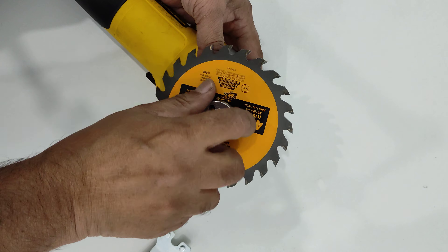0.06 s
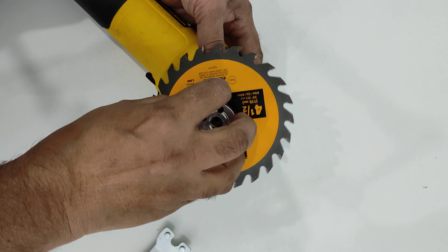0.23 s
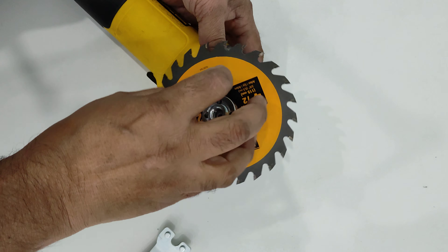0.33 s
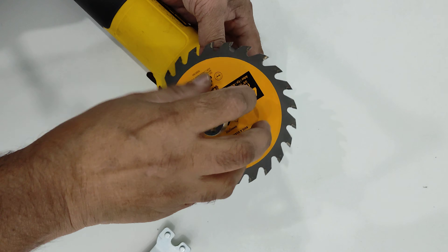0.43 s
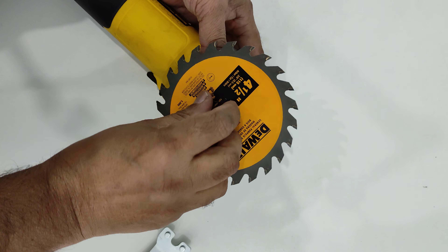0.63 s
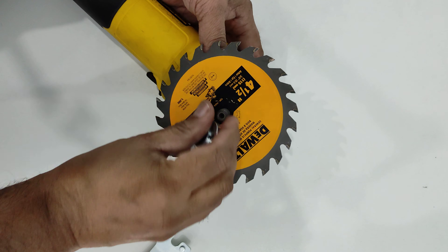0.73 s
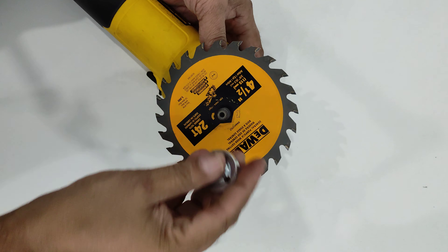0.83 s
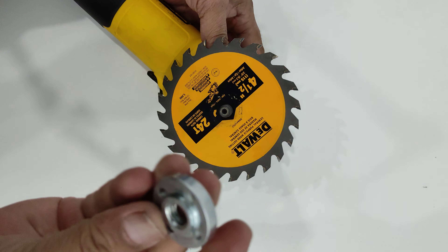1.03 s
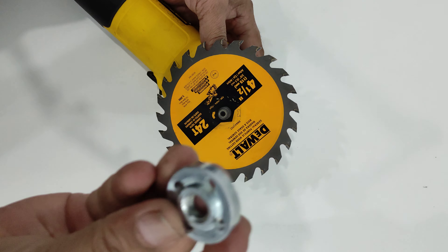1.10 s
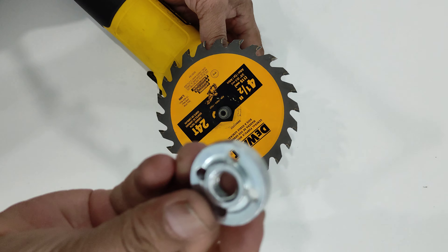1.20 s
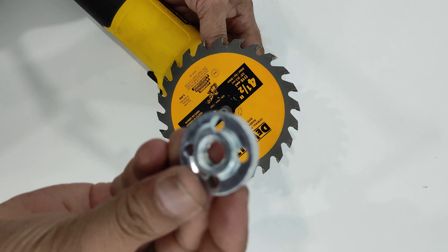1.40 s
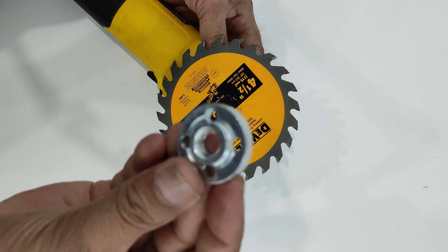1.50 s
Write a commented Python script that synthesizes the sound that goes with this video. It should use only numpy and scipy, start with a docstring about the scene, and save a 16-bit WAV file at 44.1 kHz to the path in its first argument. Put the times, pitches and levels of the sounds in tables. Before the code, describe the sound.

A steel nut clinks on an angle grinder's saw blade as it is unscrewed by hand. Light ticks come in the first 0.4 seconds, then one bright, ringing clink just before 0.5. A grainy thread rasp follows until about 0.7. Smaller clicks, blade knocks and soft, low handling bumps continue to around 1 second. The ringing then fades by 1.5, leaving the small room's faint rumble.

```python
"""Ticks, scrapes and one bright clink: a steel flange nut is spun off an angle grinder by hand.
The nut rasps on the spindle's thread, pings its tip, drops onto the saw blade and is lifted away.
Each steel contact sets nut and blade ringing; the loose blade knocks on its seat.
The hand bumps the grinder's body. The small room echoes the blows and rumbles faintly."""
import sys
import numpy as np
from scipy import signal
from scipy.fft import rfft, irfft, next_fast_len
from scipy.io import wavfile
from scipy.ndimage import map_coordinates

SR = 44100
rng = np.random.default_rng(int(sys.argv[2]) if len(sys.argv) > 2 else 0)


def wav_record(signal):
    """Record a signal, one row per channel, as 16-bit PCM in the file named by sys.argv[1]."""
    frames = np.transpose(np.atleast_2d(signal))
    bounded = np.clip(frames, -1, 1)
    # unit amplitude maps onto the largest positive 16-bit level
    quanta = np.round(bounded * 32767).astype(np.int16)
    wavfile.write(sys.argv[1], SR, quanta)


N = 68355

# Steel on steel. Each row: start in seconds, clack, tick and ring gains in dB, contact length in seconds.
CONTACTS = [(0.001, -64, -65, -53, 0.021), (0.027, -44.5, -72.5, -64, 0.0077),
            (0.167, -52.5, -43.5, -33.5, 0.035), (0.2401, -40, -29.5, -41, 0.037),
            (0.26, -50, -54, -46, 0.018), (0.3147, -41.5, -64, -54, 0.015), (0.316, -32, -42, -45, .012),
            (0.353, -38.5, -89.5, -65, 0.019), (0.4487, -24.5, -21, -9.5, 0.035),
            (0.468, -33.5, -25.5, -23.5, 0.023), (0.4721, -19, -15, 3.5, 0.04),
            (0.477, -31.5, -23.5, -23.5, 0.065), (0.5018, -26.5, -32, -15, 0.024),
            (0.607, -30.5, -37, -29, 0.025), (0.614, -36.5, -40, -31, 0.026),
            (0.717, -36.5, -33.5, -27.5, 0.032), (0.781, -50, -53, -35, .02),
            (0.829, -41.5, -77.5, -49, 0.026), (0.873, -34.5, -41, -29.5, 0.044),
            (0.938, -37.5, -69, -44.5, 0.013), (0.945, -39.5, -52, -35.5, 0.033),
            (0.99, -47, -68, -62, 0.039), (1.027, -39, -70, -71, 0.004), (1.142, -73.5, -67.5, -53, .1)]


def amp(db):
    """Decibels to gain."""
    return 10 ** (np.asarray(db) / 20)


def unit(x):
    """Scale to rms 1."""
    return x / np.sqrt(np.mean(x ** 2) + 1e-20)


def along(points, hz):
    """Interpolate (Hz, value) points on a log frequency axis."""
    points_hz, values = np.transpose(points)
    return np.interp(np.log(hz + 1), np.log(points_hz + 1), values)


def level(points):
    """Gain per sample from (seconds, dB) points."""
    return amp(np.interp(np.arange(N) / SR, *np.transpose(points)))


def wobble(rate_hz):
    """Smooth random curve, rate_hz knots a second."""
    return map_coordinates(rng.standard_normal(N // 8), [np.arange(N) * rate_hz / SR], mode='wrap')


def filtered(x, response):
    """Apply the gain response(hz) to x."""
    size = next_fast_len(N + SR // 2)
    return irfft(rfft(x, size) * response(np.fft.rfftfreq(size, 1 / SR)), size)[:N]


def noise(spectrum):
    """Noise of rms 1, coloured by (Hz, dB) points."""
    return unit(filtered(rng.standard_normal(N), lambda hz: amp(along(spectrum, hz))))


def since(start_s):
    """Seconds since start_s, zero before it."""
    return np.maximum(np.arange(N) / SR - start_s, 0)


def fade(t, t60_s, attack_s):
    """Quick rise, exponential fall."""
    return amp(-60 * t / t60_s) * (1 - np.exp(-t / attack_s))


def ring(modes, start_s, attack_s, scatter_db, pitch=1):
    """Damped modes, each randomly stronger or weaker at every blow."""
    t = since(start_s)
    phase = rng.uniform(0, 2 * np.pi)
    out = np.zeros(N)
    for hz, db, t60_s in modes:
        envelope = amp(db + scatter_db * rng.normal()) * fade(t, t60_s, attack_s)
        out += envelope * np.sin(2 * np.pi * hz * pitch * t + phase)
    return out


def room_rumble():
    """Faint, steady low noise of the room."""
    # Each row: frequency in Hz, relative level in dB.
    spectrum = [(20, -23), (60, 2.5), (115, 3), (200, -10.5), (280, 9), (350, -6.5), (900, -12.5),
                (1100, -23.5), (2500, -27), (4500, -43.5), (6600, -30.5), (7500, -27)]
    return amp(-57) * noise(spectrum)


def room_echo(x):
    """Short diffuse tail, each frequency dying at its own rate."""
    # Each row: frequency in Hz, t60 in seconds.
    decay = [(150, 0.33), (1000, 0.51), (3000, 0.62), (7000, 0.54)]
    hz, t, bins = signal.stft(rng.standard_normal(SR * 3 // 4), SR, nperseg=256)
    tail = signal.istft(bins * amp(-60 * t / along(decay, hz)[:, None]), SR, nperseg=256)[1]
    tail *= 1 - np.exp(-np.arange(len(tail)) / SR / 0.004)  # 4 ms build-up
    return signal.fftconvolve(x, tail / np.linalg.norm(tail))[:N]


def grinder_body():
    """The body booms at each bump of the hand and rumbles in its grip."""
    # Each row: frequency in Hz, level in dB, t60 in seconds.
    modes = [(69, -14.5, 0.22), (108, -10, 0.2), (147.3, 3.5, .17), (171, -7.5, 0.066), (274.9, -7.5, 0.19)]
    # Bumps, then grip envelope. Each row: time in seconds, gain in dB.
    bumps = [(0.002, -42), (0.166, -29.5), (0.199, -31.5), (0.223, -31), (0.448, -32.5), (0.473, -29),
             (0.616, -31.5), (0.709, -40), (0.855, -26.5), (0.876, -35.5), (0.99, -44.5)]
    grip = [(0, -40), (.13, -54), (.23, -49.5), (.4, -46), (.62, -40), (.8, -47), (.98, -46), (1.12, -57.5),
            (1.55, -74.5)]
    # Each row: frequency in Hz, relative level in dB.
    grip_spectrum = [(25, -40.5), (65, -4), (110, -8), (146, 6), (200, -10), (275, -7.5), (360, -27.5),
                     (800, -22.5), (2000, -58.5)]
    booms = sum(amp(db) * ring(modes, start_s, attack_s=0.0043, scatter_db=4.1) for start_s, db in bumps)
    return booms + level(grip) * noise(grip_spectrum)


def thread_rasp():
    """The turning nut rubs along the thread with a grainy rasp."""
    # Each row: time in seconds, gain in dB.
    envelope = [(0, -55), (.06, -61.5), (.15, -76), (.18, -52), (.28, -49), (.43, -59), (.48, -38.5),
                (.52, -34.5), (.57, -42), (.625, -34.5), (.68, -49.5), (.77, -56), (.85, -54), (.91, -52.5),
                (1.02, -67.5), (1.12, -72), (1.2, -95.5)]
    # Each row: frequency in Hz, relative level in dB.
    spectrum = [(200, -19), (600, -30.5), (1200, 7), (1800, 7.5), (2400, -4), (3000, -8.5), (5700, -13.5),
                (6100, -12.5), (7500, -8.5)]
    friction = noise(spectrum)
    grain_db = 2.96 * wobble(450) + 3.7 * wobble(60.35)
    return level(envelope) * unit(friction * amp(grain_db))


def blade_knocks():
    """The loose blade, damped by the fingers, knocks and chatters on its seat."""
    # Each row: start in seconds, gain in dB, pitch factor.
    knocks = [(0.166, -45, 1.34), (0.223, -33.5, 1.08), (0.354, -42, 0.88), (0.450, -29.5, 0.92),
              (0.617, -32, 2), (0.871, -31, 1.016), (0.881, -38, .98), (0.943, -33.5, 1.045),
              (1.03, -44.5, 1), (1.075, -53.5, 1.03)]
    # Each row: frequency in Hz, level in dB, t60 in seconds.
    seat_modes = [(772, -8.5, 0.049), (866, -6.5, 0.035), (1109, 3.5, 0.037), (1256, -11.5, 0.17),
                  (1516, -2.5, 0.023), (1593, -11.5, .05), (2110, -21, 0.047)]
    out = np.zeros(N)
    for start_s, db, pitch in knocks:
        out += amp(db) * ring(seat_modes, start_s, attack_s=0.0008, scatter_db=1.5, pitch=pitch)
    chatter_db = 4 * wobble(400)
    return out * amp(chatter_db)


def spindle_pings():
    """The held nut pings the spindle tip; some touches are bright, some dull."""
    # Each row: start in seconds, gain in dB, tilt in dB per octave.
    touches = [(0.163, -60.5, 20), (0.222, -49.5, 19), (0.718, -34.5, -19.5), (0.83, -51, -19.5),
               (0.872, -47, 18)]
    # Each row: frequency in Hz, level in dB, t60 in seconds.
    modes = [(1950, -4, 0.028), (2730, 1.5, 0.06), (3240, -4, .04), (4980, -17.5, 0.035), (5330, -16, 0.04)]
    pivot_hz = modes[1][0]
    out = np.zeros(N)
    for start_s, db, tilt in touches:
        tilted = [(hz, mode_db + tilt * np.log2(hz / pivot_hz), t60_s) for hz, mode_db, t60_s in modes]
        out += amp(db) * ring(tilted, start_s, attack_s=0.0015, scatter_db=3.9)
    scratch_db = 0.5 * wobble(460)
    return out * amp(scratch_db)


def impacts():
    """Each contact is a short clack of the blade and a sharper tick of the nut."""
    # Each row: frequency in Hz, relative level in dB.
    clack_spectrum = [(60, -18), (300, -22), (450, -2.5), (580, -15.5), (850, 0.5), (1300, -4.5), (2150, 0),
                      (2500, -12), (4000, -16.5), (5500, -17.5), (7500, -29.5)]
    tick_spectrum = [(500, -46.5), (2500, -24), (4000, -12.5), (5700, -22.5), (5980, 1.5), (6600, -2),
                     (7200, 0), (7600, -6.5)]
    out = np.zeros(N)
    for start_s, clack_db, tick_db, _, length_s in CONTACTS:
        t = since(start_s)
        out += amp(clack_db) * noise(clack_spectrum) * fade(t, 1.52 * length_s, attack_s=0.0012)
        tick_envelope = fade(t, length_s, attack_s=0.0001) + 0.67 * fade(t, 0.0058, attack_s=0.0001)
        out += amp(tick_db) * noise(tick_spectrum) * tick_envelope
    return out


def clink():
    """Nut and blade ring on after every contact, wavering slightly in level."""
    # Each row: frequency in Hz, relative level in dB, t60 in seconds.
    nut_modes = [(4381, -39.5, .31), (5995, -37, .24), (6031, -37, .22), (6068, -22, .29), (6089, -33, .24)]
    blade_modes = [(1007, -35, .25), (1217, -41, .22), (1561, -45, .35), (2191, -38, .25),
                   (2587, -38.5, .68), (3854, -59, 1.8), (5230, -53, .5), (5900, -55, 1.8),
                   (6286, -40, .25), (6430, -42, .35), (6665, -44, 1.1), (7102, -44, .3), (7253, -54, .9)]
    out = np.zeros(N)
    for modes, part_db in ((nut_modes, 1.5), (blade_modes, -2.5)):
        tone = np.zeros(N)
        for start_s, _, _, ring_db, _ in CONTACTS:
            tone += amp(ring_db + part_db) * ring(modes, start_s, attack_s=0.003, scatter_db=0.5)
        waver_db = 0.72 * wobble(70)
        out += tone * amp(waver_db)
    return out


def scene():
    """Mono mix: metal sounds, the echo of their blows, grinder body and room rumble."""
    hits = impacts()
    taps = blade_knocks() + spindle_pings()
    echo = amp(-7.5) * room_echo(hits + amp(-4) * taps)
    return (hits + taps + clink() + echo + thread_rasp() + grinder_body() + room_rumble())[None]


def record(dry):
    """The microphone falls off steeply above its band limit."""
    cutoff_hz = 7530
    return filtered(dry[0], lambda hz: 1 / np.sqrt(1 + (hz / cutoff_hz) ** 400))[None]


dry = scene()
out = record(dry)
wav_record(out)
```